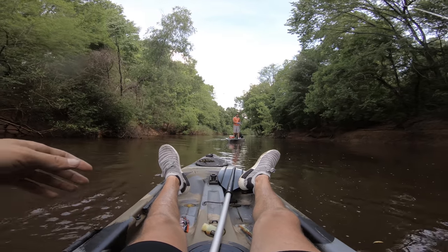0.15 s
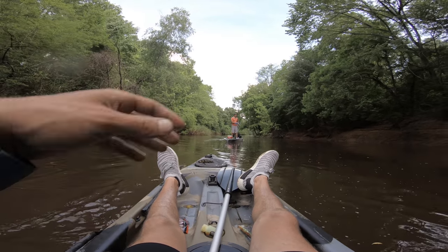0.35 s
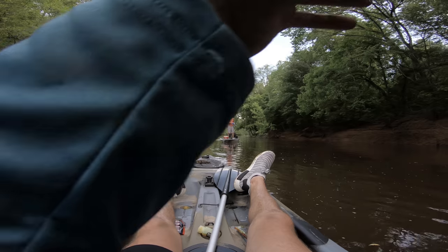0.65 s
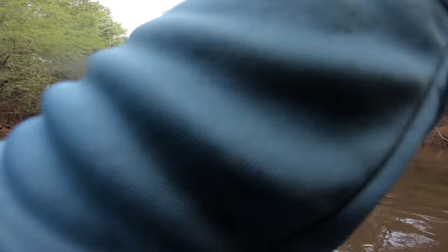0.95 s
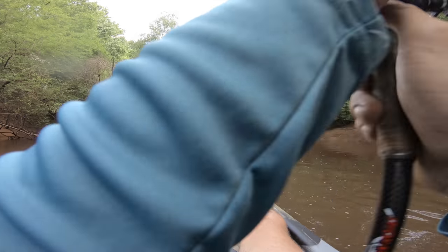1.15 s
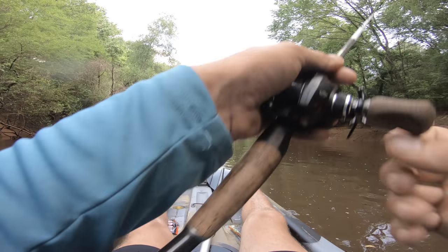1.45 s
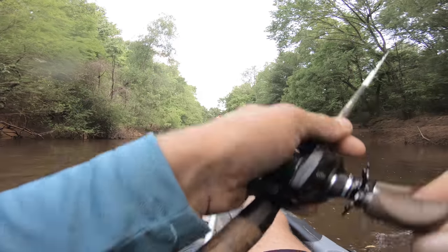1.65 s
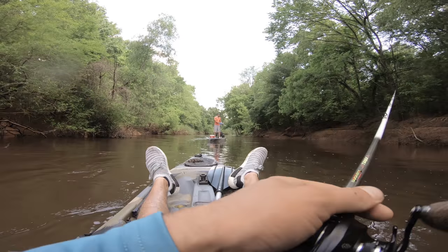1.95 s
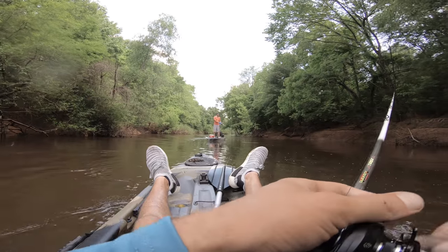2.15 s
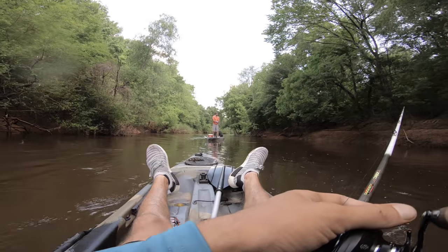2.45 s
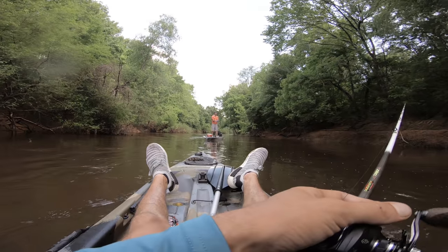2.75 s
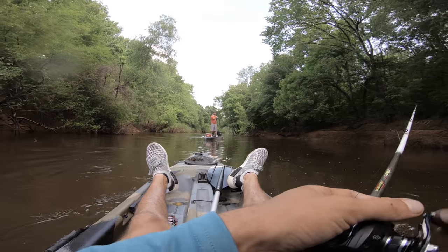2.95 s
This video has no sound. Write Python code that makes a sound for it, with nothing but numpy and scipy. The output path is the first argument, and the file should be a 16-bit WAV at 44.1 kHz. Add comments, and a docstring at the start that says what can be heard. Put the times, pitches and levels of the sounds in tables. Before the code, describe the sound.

One sharp, ringing click from a fishing reel, close to the microphone in a kayak on a quiet creek. Small birds chirp faintly first, then the rod bumps softly and line hisses briefly before the click.

```python
"""A baitcasting reel, close to the microphone, in a kayak drifting on a quiet wooded creek.
Sleeve and rod brush and bump, line hisses faintly off the spinning spool, then the gear snaps
home with one sharp, ringing click. Back in the trees small birds whistle and chirp, and echoes
trail each note. An engine drones far off, and air sways against the microphone."""
import sys
import numpy as np
from scipy import signal
from scipy.fft import rfft, irfft
from scipy.io import wavfile

SR = 44100
rng = np.random.default_rng(int(sys.argv[2]) if len(sys.argv) > 2 else 0)


def to_wav(s):
    """Save 16-bit WAV."""
    ch = np.atleast_2d(s).T  # columns
    pcm = np.round(np.clip(ch, -1, 1) * 32767)  # PCM
    wavfile.write(sys.argv[1], SR, pcm.astype(np.int16))


N = 136710
TIME = np.arange(N) / SR
CUTOFF_HZ = 15900

# spectra of the creek's hush and of its trace of stereo width: f/Hz, level/dB
HUSH_COLOUR = [(30, -4.5), (75, -3), (130, -8), (220, -11.5), (350, -15.5), (500, -16.5), (900, -17),
               (1080, -14.5), (1400, -22), (1800, -21), (2300, -24.5), (4400, -23.5), (5400, -30.5),
               (7000, -39), (10000, -41.5), (15500, -45)]
SIDE_COLOUR = [(200, -6), (2500, -10.5), (11000, 2), (15000, -26)]
# air pushing on the microphone as the body turns: t/s, level/dB
SWAY_LEVELS = [(0, -45), (.6, -48.5), (.85, -41), (1.45, -35), (1.9, -44.5), (3.1, -43.5)]
# spectrum of the rumble in that air: f/Hz, level/dB
RUMBLE_COLOUR = [(20, 6), (40, -2), (70, -16.5), (1000, -77)]
# outline of the far engine's harmonics: f/Hz, level/dB
ENGINE_SPECTRUM = [(38, -69), (133, -71.5), (240, -79), (285, -73), (304, -87.5), (490, -81), (590, -94),
                   (665, -82), (850, -90), (1040, -78.5), (1120, -88), (1220, -90.5)]
# thin arched whistles: t/s, length/s, top f/Hz, level/dB
WHISTLES = [(-.025, 0.074, 7370, -67.5), (0.046, 0.045, 6650, -64.5), (2.888, 0.06, 7410, -59.5),
            (2.983, 0.052, 6990, -58.5)]
# low raspy chips, and a run of rising chirps: t/s, top f/Hz, level/dB
CHIPS = [(.008, 3950, -61.5), (.219, 3840, -57.5), (0.451, 3700, -63.5), (3.081, 4300, -66)]
CHIRPS = [(.112, 5950, -60.5), (.197, 5780, -61), (.283, 5800, -60.5), (.367, 5730, -61), (.452, 5700, -63),
          (.538, 5700, -61.5), (.628, 5670, -62.5), (3.055, 5860, -64)]
# swishes of line and sleeve: centre t/s, half length/s, level/dB
SWISHES = [(.38, 0.26, -80), (0.796, 0.055, -80.5), (1.307, 0.054, -76.5), (1.49, 0.1, -75),
           (1.75, 0.064, -75), (2.1, 0.061, -78)]
# their spectrum: f/Hz, level/dB
SWISH_COLOUR = [(3000, -11), (7500, -7), (10500, -3), (13500, -15), (16000, -38)]
# thin high squeaks: t/s, length/s, first f/Hz, last f/Hz, level/dB
SQUEAKS = [(0.186, 0.02, 10600, 10750, -78), (.195, .115, 11500, 10600, -82),
           (.735, 0.043, 11800, 12900, -83), (0.804, 0.026, 11600, 10500, -75)]
# nasal bird calls: t/s, length/s, f/Hz, level/dB
NASAL_CALLS = [(0.725, 0.09, 362, -61.5), (0.863, 0.076, 356.5, -66.5)]
# their partials: harmonic number, level/dB
NASAL_PARTIALS = [(10, -6), (11, -2), (12, -9), (13, -7)]
# ticks of hand and tackle: t/s, level/dB, t60/s
TICKS = [(0.787, -56, .012), (.828, -59, .02), (1.062, -57.5, 0.052), (1.146, -60.5, 0.031),
         (1.549, -59, .02), (2.429, -56.5, 0.042)]
# their spectrum: f/Hz, level/dB
TICK_COLOUR = [(1000, -31), (3100, 6), (8000, -13), (12000, -17), (16000, -26)]
# low surges as the angler shifts: centre t/s, half length/s, level/dB
SURGES = [(.84, .03, -55), (1.07, 0.024, -52), (2.6, 0.017, -54.5)]
# their spectrum: f/Hz, level/dB
SURGE_COLOUR = [(40, 1.5), (105, -3), (400, -49)]
# bumps of the rod butt: t/s, level/dB
BUMPS = [(1.1365, -47.5), (1.218, -57)]
# spectrum of the butt rubbing: f/Hz, level/dB
RUB_COLOUR = [(150, 7.5), (420, 0), (900, -9), (1500, -32.5), (5000, -50)]
# the spool's whir through the cast: t/s, level/dB
SPOOL_LEVELS = [(1.2, -91), (1.38, -80), (1.54, -66), (1.66, -75), (1.93, -97), (2.0, -100)]
# its spectrum: f/Hz, level/dB
SPOOL_COLOUR = [(800, -21), (2000, -14), (3400, 0.5), (5000, -9), (7000, -23), (14000, -29)]
# contacts inside the reel as it engages: t/s, level/dB, low f/Hz, high f/Hz
CONTACTS = [(1.944, -27, 3800, 13100), (1.9467, -16, 3800, 12900), (1.9485, -14, 302, 4530),
            (1.9492, -16, 4000, 8900), (1.9503, -2, 407, 12400)]
# modes of the reel's body and of its thumb bar: f/Hz, level/dB, t60/s
REEL_MODES = [(410, -47, 0.032), (830, -35.5, 0.018), (1675, -20.5, 0.026), (2380, -30.5, 0.013),
              (3720, -26, 0.014), (4925, -11.3, 0.0052), (6080, -16.5, 0.0037), (7650, -27, 0.006),
              (8600, -32, 0.0043), (9990, -29, 0.0069), (12400, -29.5, 0.003), (13700, -32, 0.003)]
BAR_MODES = [(360, -54, 0.077), (880, -38.5, .024), (3950, -26, .009), (6970, -27, .005), (9200, -28, .004),
             (13000, -30, .0025)]
# spectrum of loose parts and hull ringing after the click: f/Hz, level/dB
RATTLE_COLOUR = [(200, -6), (400, -10), (850, 11.5), (1400, -7), (2600, 5), (4100, 7.5), (5500, -4),
                 (7000, -4), (10000, -6.5), (16000, -32)]


def from_db(db):
    """Decibels to gain."""
    return 10 ** (np.asarray(db) / 20)


def rms_one(x):
    """Scale to unit rms."""
    return x / np.sqrt(np.mean(x ** 2) + 1e-20)


def band(x, low_hz, high_hz, order=2):
    """Butterworth band-pass."""
    return signal.sosfilt(signal.butter(order, [low_hz, high_hz], "band", fs=SR, output="sos"), x + 1e-18)


def noise(colour):
    """Noise of unit rms with the given spectral shape, rolled off below its first point."""
    hz, db = np.transpose(colour)
    f = np.fft.rfftfreq(N, 1 / SR) + 1e-3
    gain = from_db(np.interp(np.log(f), np.log(hz), db)) * np.minimum(f / hz[0], 1)
    return rms_one(irfft(rfft(rng.standard_normal(N)) * gain, N))


def drift(rate_hz):
    """A random wander of unit rms, mostly slower than rate_hz."""
    f = np.fft.rfftfreq(N, 1 / SR)
    return rms_one(irfft(rfft(rng.standard_normal(N)) / (1 + (f / rate_hz) ** 4), N))


def tap(t):
    """A unit impulse at time t."""
    return signal.unit_impulse(N, int(t * SR))


def dying(t, t60):
    """An envelope that jumps to one at time t and falls 60 dB in t60 seconds."""
    return (TIME >= t) * from_db(-60 * np.maximum(TIME - t, 0) / t60)


def ring(force, hz, t60):
    """One damped mode driven by a force."""
    radius, angle = from_db(-60 / (t60 * SR)), 2 * np.pi * hz / SR
    return signal.lfilter([0, np.sin(angle)], [1, -2 * radius * np.cos(angle), radius ** 2], force + 1e-18)


def note(start, length, edge_s=0.0086):
    """Time within a note, and its soft-edged gate."""
    age = np.clip(TIME - start, 0, length)
    return age, np.clip(np.minimum(age, length - age) / edge_s, 0, 1)


def swells(rows):
    """An envelope of rounded swells."""
    return sum(from_db(db) * np.exp(-((TIME - t) / half) ** 4 / 2) for t, half, db in rows)


def tone(hz):
    """A sine of unit rms following a pitch curve."""
    return np.sqrt(2) * np.sin(2 * np.pi * np.cumsum(hz) / SR)


def creek():
    """The hush of water and forest all around, flickering slightly in level."""
    return from_db(-58 + 0.82 * drift(rate_hz=12)) * noise(HUSH_COLOUR)


def microphone_air():
    """Air pushes unevenly on the microphone: a slow sway with a faint rumble above it."""
    sway = rms_one(band(rng.standard_normal(N), low_hz=5, high_hz=8.93))
    rumble = from_db(-25.5) * noise(RUMBLE_COLOUR)
    return from_db(np.interp(TIME, *np.transpose(SWAY_LEVELS))) * (sway + rumble)


def far_engine(firing_hz=19.03):
    """Distance smears the firing pulses into a drone whose harmonics each fade in and out."""
    out = 0
    for hz in firing_hz * np.arange(2, 65):
        gain = from_db(np.interp(hz, *np.transpose(ENGINE_SPECTRUM)))
        fading = rms_one(1 + .45 * drift(rate_hz=1.12))
        out += gain * fading * np.sqrt(2) * np.sin(2 * np.pi * (hz * TIME + rng.random()))
    return out


def whistles(rise_s=0.006, fall_s=0.0026):
    """A bird's thin whistles scoop up to a wavering pitch and drop at the end."""
    waver = 1 + 0.0095 * drift(rate_hz=180)
    out = 0
    for start, length, hz, db in WHISTLES:
        age, gate = note(start, length, edge_s=0.014)
        arch = 1 - 0.083 * np.exp(-age / rise_s) - 0.055 * np.exp((age - length) / fall_s)
        out += from_db(db) * gate * tone(hz * arch * waver)
    return out


def chips(rasp, rise_s=0.00817):
    """Short, lower bird notes scoop upward; a fast pitch flutter makes them raspy."""
    out = 0
    for start, hz, db in CHIPS:
        age, gate = note(start, length=0.037)
        scoop = 1 - .22 * np.exp(-age / rise_s)
        out += from_db(db) * gate * tone(hz * scoop * (1 + .6 * rasp))
    return out


def chirps(rasp, rise_s=.042, swell_db=5):
    """Each chirp grows louder and cleaner as its pitch climbs."""
    out = 0
    for start, hz, db in CHIRPS:
        age, gate = note(start, length=.06)
        climb_left = 1 - np.minimum(age / rise_s, 1)
        pitch = hz * (1 - .32 * climb_left) * (1 + rasp * (.2 + climb_left))
        out += from_db(db - swell_db * climb_left) * gate * tone(pitch)
    return out


def songbirds(rough_db=3):
    """Small birds in the trees, their song roughened by a fast flicker in level."""
    song = whistles()
    rasp = .14 * rms_one(band(rng.standard_normal(N), low_hz=200, high_hz=800))
    song += chips(rasp) + chirps(rasp)
    return song * from_db(rough_db * drift(rate_hz=120))


def woods(x, wet_db):
    """Trunks and leaves scatter a long tail that reaches the microphone after the direct sound."""
    echoes = rng.standard_normal(N) * dying(t=.012, t60=0.81)
    return x + from_db(wet_db) * signal.fftconvolve(x, echoes / np.linalg.norm(echoes))[:N]


def swishes():
    """Line and sleeve brush close by as the rod is brought round."""
    return noise(SWISH_COLOUR) * swells(SWISHES)


def squeaks():
    """Faint wavering glides, very high."""
    waver = 1 + .022 * drift(rate_hz=200)
    out = 0
    for start, length, first_hz, last_hz, db in SQUEAKS:
        age, gate = note(start, length)
        glide = first_hz + (last_hz - first_hz) * age / length
        out += from_db(db) * gate * tone(glide * waver)
    return out


def nasal_bird(rise_s=0.0149):
    """Two buzzy calls from the trees, each a stack of high harmonics scooping up to pitch."""
    out = 0
    for start, length, hz, db in NASAL_CALLS:
        age, gate = note(start, length)
        pitch = hz * (1 - 0.092 * np.exp(-age / rise_s) + .004 * drift(rate_hz=150))
        out += gate * sum(from_db(db + partial_db) * tone(k * pitch) for k, partial_db in NASAL_PARTIALS)
    return out


def tackle_ticks():
    """Hand and tackle touch in small, quickly dying bursts of noise."""
    return noise(TICK_COLOUR) * sum(from_db(db) * dying(t, t60) for t, db, t60 in TICKS)


def boat_surges():
    """Low swells as the angler shifts in the kayak."""
    return noise(SURGE_COLOUR) * swells(SURGES)


def rod_bumps(first_hz=340, last_hz=150, fall_s=.012, attack_s=.004):
    """The rod butt bumps softly with a hollow, falling tone, and rubs on the first bump."""
    thuds = 0
    for t, db in BUMPS:
        age = np.maximum(TIME - t, 0)
        pitch = last_hz + (first_hz - last_hz) * np.exp(-age / fall_s)
        envelope = np.minimum(age / attack_s, 1) * dying(t, t60=.15)
        thuds += from_db(db) * envelope * tone(pitch)
    _, rub_gate = note(BUMPS[0][0], length=0.035)
    return thuds + from_db(-53) * noise(RUB_COLOUR) * rub_gate


def spool(turn_hz=191):
    """Line peels off the spool in a hiss that pulses with each turn."""
    turning = 1 + 0.55 * np.sin(2 * np.pi * turn_hz * TIME)
    return from_db(np.interp(TIME, *np.transpose(SPOOL_LEVELS))) * turning * noise(SPOOL_COLOUR)


def reel_click(chatter_s=.00081, notch_hz=1290):
    """Close up, the gear snaps home: each contact cracks, chatters once and rings the reel's body."""
    force = sum(from_db(db) * band(tap(t), low, high) for t, db, low, high in CONTACTS)
    rebound = np.roll(force, round(chatter_s * SR))
    force += from_db(-5) * band(rebound, low_hz=2630, high_hz=CUTOFF_HZ, order=1)
    body = sum(from_db(db) * ring(force, hz, t60) for hz, db, t60 in REEL_MODES)
    grit = from_db(-19.5) * rng.standard_normal(N)
    crack = sum(from_db(db) * band(grit * dying(t, t60=0.011), low, high) for t, db, low, high in CONTACTS)
    return signal.lfilter(*signal.iirnotch(notch_hz, Q=3, fs=SR), body + crack)


def thumb_bar(t=1.9602):
    """The bar pops up and rings just after the gear engages; loose parts and hull rattle on."""
    bar = sum((-1) ** k * from_db(db) * ring(tap(t), hz, t60) for k, (hz, db, t60) in enumerate(BAR_MODES))
    rattle = from_db(-37.5 + 3 * drift(rate_hz=400)) * noise(RATTLE_COLOUR)
    return bar + rattle * dying(t, t60=0.049)


def scene():
    """Heard from the kayak: everything sits in the centre, with a trace of width in the hush."""
    birds = woods(songbirds(), wet_db=-3) + woods(nasal_bird(), wet_db=-8.5)
    width = from_db(-90) * noise(SIDE_COLOUR) * np.array([[1], [-1]])
    angler = reel_click() + thumb_bar() + tackle_ticks() + rod_bumps() + swishes() + spool()
    background = squeaks() + far_engine() + creek() + microphone_air() + boat_surges()
    return angler + birds + background + width


def record(dry):
    """The recorder cuts the top of the treble steeply."""
    return signal.sosfilt(signal.ellip(10, .1, 70, CUTOFF_HZ, fs=SR, output="sos"), dry)


dry = scene()
out = record(dry)
to_wav(out)
```